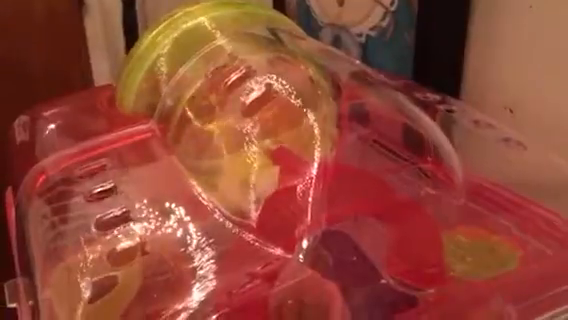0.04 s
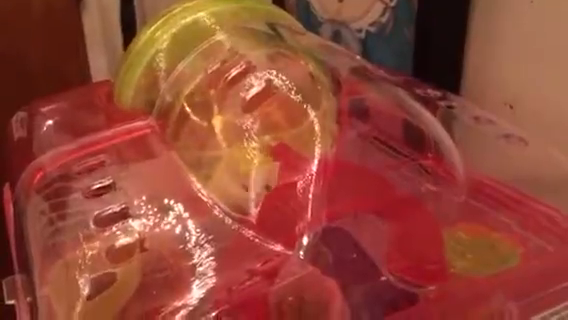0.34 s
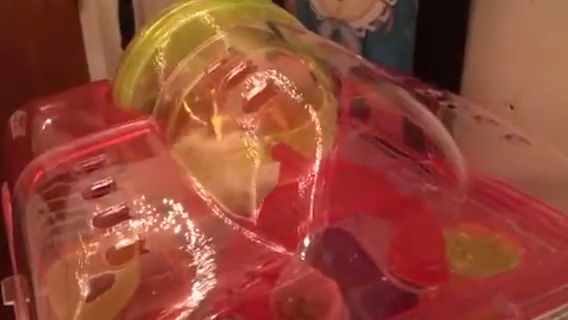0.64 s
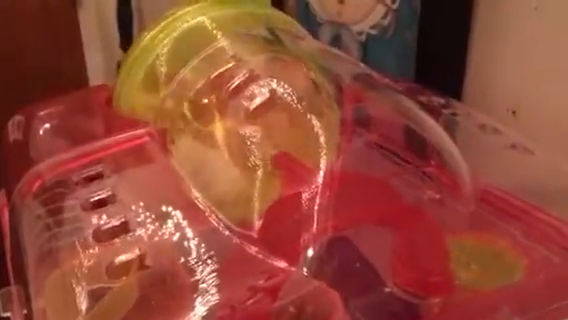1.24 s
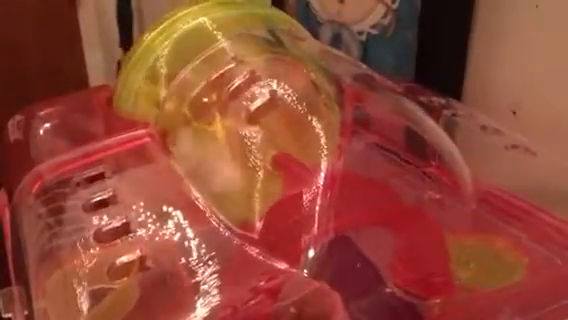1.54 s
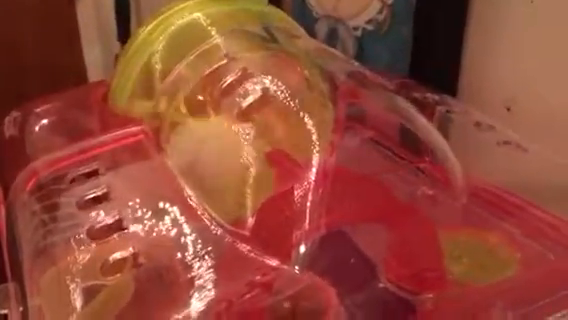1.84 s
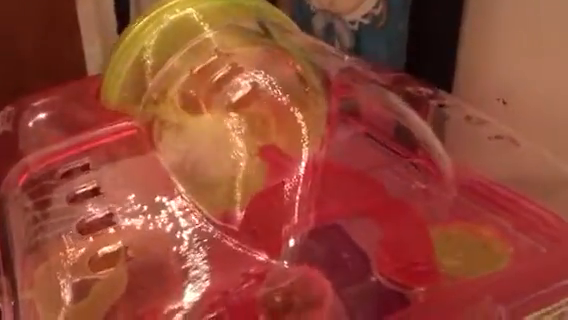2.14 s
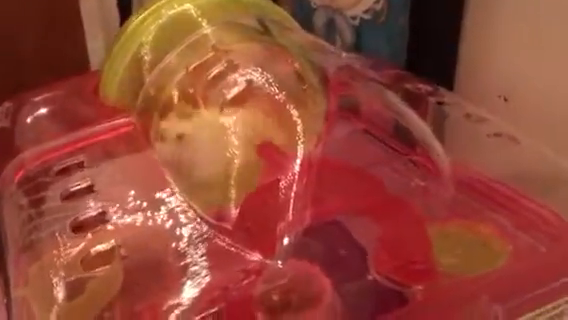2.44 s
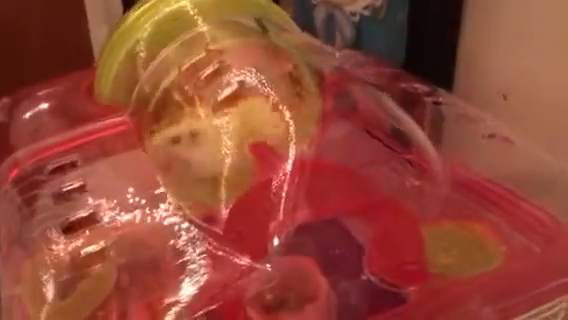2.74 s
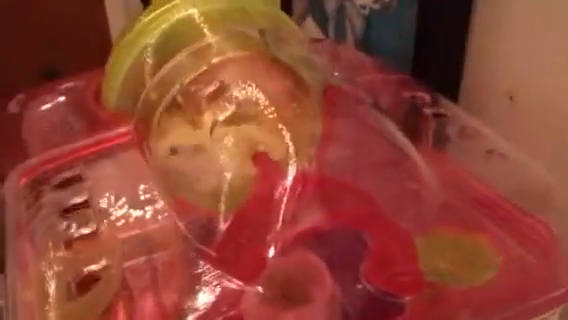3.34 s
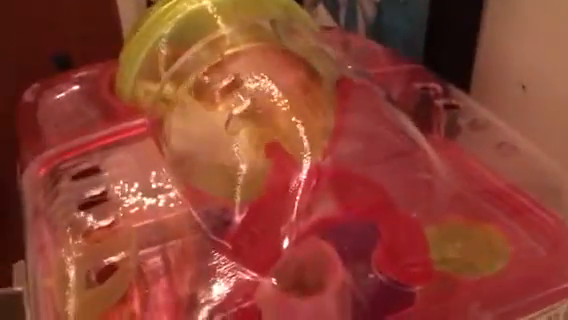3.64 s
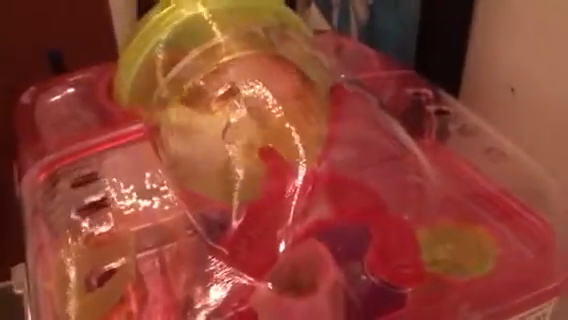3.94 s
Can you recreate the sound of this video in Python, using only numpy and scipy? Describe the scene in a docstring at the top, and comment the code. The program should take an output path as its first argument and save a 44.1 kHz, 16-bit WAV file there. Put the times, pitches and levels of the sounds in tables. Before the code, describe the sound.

A hamster runs in a plastic wheel that rumbles and knocks against its cage.

```python
"""Hamster in a plastic wheel

A hamster starts to run in a plastic wheel fixed to a plastic cage, in a quiet room. Claws tick,
paws tap and scuff on the track, and the hollow wheel booms under its weight. The turning wheel
rumbles through the cage in surges; its loose axle creaks early on and knocks at speed.
A low hum and a faint hiss lie underneath."""
import sys
import numpy as np
from scipy import signal
from scipy.fft import rfft, irfft
from scipy.io import wavfile
from scipy.ndimage import uniform_filter1d

SR = 44100
rng = np.random.default_rng(int(sys.argv[2]) if len(sys.argv) > 2 else 0)


def digitize_waveform(pressure):
    """Quantize a signal to 16-bit integers and store it at the path in sys.argv[1].

    Rows of a 2-D input are taken as channels; values are limited to [-1, 1].
    """
    field = np.atleast_2d(pressure).T
    bounded = np.clip(field, -1, 1)
    quanta = np.round(bounded * 32767).astype(np.int16)
    wavfile.write(sys.argv[1], SR, quanta)


N = 176400

# EQ curves of room tone, scuffs, claws, rumble and knocks: f/Hz, relative level/dB
AIR_EQ = [(20,-35),(35,-12),(55,3.5),(90,-3),(140,0),(220,-13.5),(330,-18),(600,-28),(1200,-33.5),(3000,-38.5),(8000,-41),(16000,-38)]
SCUFF_EQ = [(60,-24),(280,6),(900,5.5),(1600,4.5),(3200,-3),(5000,-8),(9000,-11.5),(16000,-12)]
CLAW_EQ = [(150,-10),(600,3),(1800,-3),(4000,0.5),(7000,4.5),(9500,5),(10500,2.5),(12500,7.5),(16000,2.5)]
ROLL_EQ = [(50,-16.5),(110,-9),(180,2.5),(300,-1),(600,-0.5),(760,-11.5),(950,-2),(1400,-16),(2400,-21),(5000,-35.5),(15000,-52)]
KNOCK_EQ = [(80,-22),(180,-9),(290,1.5),(700,2),(1300,4),(2200,-4),(3300,0.5),(4900,-4),(6500,-1.5),(8200,-6),(11000,-4.5),(16000,-7)]
# steady hum: f/Hz, level/dB
HUM_PARTIALS = [(56.7,-56),(140,-67.5),(187.5,-68.5)]
# decay of the room, and of a knock in the shell: f/Hz, T60/s
ROOM_DECAY = [(200,0.17),(1000,0.52),(4000,0.28),(14000,0.15)]
SHELL_DECAY = [(200,0.13),(1000,0.13),(3000,0.057),(7000,0.044),(14000,0.017)]
# resonances of wheel and cage: f/Hz, width/Hz, boost/dB
PLASTIC_MODES = [(193,12,8.5),(234.5,30,6),(287.8,28,9),(328,5.9,7),(431,17.4,7.5),(653,68,5),(928.5,39,8),(1180,12,7.5),(1370,18,0.5),(1563,20,6),(2069,57,7.5),(2790,270,5),(4040,660,4),(5820,300,4.5)]
# boom of the hollow wheel: f/Hz
WHEEL_MODES = [175, 294.6, 335, 479, 658.5]
# axle creaks: t/s, length/s, level/dB, f/Hz
CREAK_CUES = [(.004,0.059,-72.5,6500),(0.06,0.034,-59.5,3240),(1.194,0.029,-56,3830)]
# feet and rim scuffing: t/s, length/s, relative level/dB
SCUFF_CUES = [(0.048,0.053,-55),(0.214,0.052,-58.5),(0.734,0.037,-67),(1.02,0.045,-58),(1.172,0.083,-56),(1.861,0.065,-44.5),(2.008,0.024,-49),(2.12,0.044,-44.5),(2.32,0.06,-40.5),(2.717,0.03,-38),(3.539,0.039,-41)]
# paws landing: t/s, relative level/dB, struck spot's f/Hz
PAW_CUES = [(.064,-67,1547),(.232,-70,1540),(0.972,-62,987),(1.137,-55,974),(1.452,-48,596),(1.538,-43,616),(1.696,-57,940),(2.086,-44,612)]
# claws ticking on the track: t/s, relative level/dB, fade/s
CLAW_CUES = [(0.729,-67,0.013),(.787,-63.5,0.0044),(1.004,-59,.004),(1.018,-53,0.011),(1.1564,-46,0.0081),(1.1844,-52,0.0029),(1.2027,-47,.009),(1.2394,-47,0.0076),(1.247,-50,0.0087),(1.273,-46,0.0046),(1.278,-42.5,0.0049),(1.3161,-46,0.008),(1.327,-53,.006),(1.3875,-59,0.0092),(1.422,-59,0.0044),(1.491,-56,.006),(1.509,-48,0.005),(1.5894,-51.5,0.013),(1.6185,-50,0.0072),(1.7282,-51,0.0096),(1.7415,-49,0.0046),(1.805,-55,0.0044),(1.983,-54.5,0.0057),(2.083,-45.5,0.0077),(2.141,-53.5,0.016),(2.608,-50,0.0051),(3.588,-49,0.0079),(3.779,-57,0.0069),(3.907,-50,0.0036)]
# the runner's weight landing: t/s, relative level/dB, most excited f/Hz
THUMP_CUES = [(1.177,-41.5,169),(1.195,-45,620),(1.232,-54,300),(1.521,-47,220),(1.905,-42.5,350),(2.748,-38,350),(3.235,-41,377)]
# fader rides of the light patter and the rolling wheel: t/s, relative level/dB
PATTER_FADER = [(.6,-98),(.67,-67),(.7,-90),(.96,-75.5),(1.03,-56.5),(1.25,-61.5),(1.8,-60.5),(2.2,-59.5),(2.75,-57.5),(3.35,-60),(3.6,-59.5),(4,-61)]
ROLL_FADER = [(0.95,-64.5),(1.17,-58.5),(1.245,-42.5),(1.35,-59),(1.42,-51),(1.51,-49.5),(1.54,-44),(1.7,-47),(1.73,-43.5),(1.82,-49),(1.915,-38),(1.95,-43.5),(2.12,-47.5),(2.16,-39),(2.22,-46.5),(2.26,-42),(2.29,-45.5),(2.35,-36),(2.44,-41),(2.52,-39),(2.6,-46),(2.67,-37.5),(2.72,-41.5),(2.745,-33),(2.89,-42),(2.97,-39),(3.01,-37.5),(3.06,-44),(3.25,-37),(3.29,-47),(3.61,-38),(3.73,-39.5),(3.79,-42.5),(4.0,-41.5)]
# axle knocks: t/s, relative level/dB, treble tilt/(dB per octave), low shelf/dB, struck spot's f/Hz
KNOCK_CUES = [(1.834,-53,-3,5.5,1420),(2.085,-47,-4,-17,2590),(2.307,-43.5,1,-4,2750),(2.4765,-42.5,3.5,12,1680),(2.5128,-35.5,1.5,6,2770),(2.675,-39,-1.5,-8,3600),(2.7124,-40.5,1,1,5850),(2.732,-34.5,1,7,1990),(2.7706,-31.5,1,-4,1993),(2.8581,-41.5,-3.5,-19,1380),(2.9209,-33,-1.5,-6,1550),(2.9538,-39,1,-8,3830),(3.008,-36,-3,-21,1310),(3.1036,-36.5,-2,-19,1400),(3.1347,-38.5,-1.5,-26,1370),(3.173,-46.5,3.5,-5,5720),(3.206,-35,0.5,-12.5,5880),(3.3736,-53,-6,-7,2200),(3.44,-44.5,-1,-3,1750),(3.48,-43,4,15,1520),(3.5934,-43.5,-1.5,3,2070),(3.655,-41.5,-3.5,-6,2160),(3.805,-42,1,5.5,4170),(3.9178,-43.5,-5,-19,3110)]


def amp(db):
    """Decibels to gain."""
    return 10 ** (np.asarray(db) / 20)


def unit(x):
    """Scales to rms 1."""
    return x / np.sqrt(np.mean(x ** 2) + 1e-20)


def curve_at(points, hz):
    """Reads a table on a log-frequency axis."""
    f, value = np.transpose(points)
    return np.interp(np.log(hz + 1), np.log(f + 1), value)


def fader(points):
    """A gain ride through the points, silent before the first."""
    return amp(np.interp(np.arange(N) / SR, *np.transpose(points), left=-120))


def add(mix, start, sound):
    """Drops a sound into the mix, start seconds in."""
    part = mix[max(round(start * SR), 0):][:len(sound)]
    part += sound[:len(part)]


def strike(t, rise_s, t60):
    """Envelope of a hit: linear attack, exponential decay."""
    return np.minimum(t / rise_s, 1) * 1e-3 ** (t / t60)


def noise_tail(decay, size, bands=8):
    """Noise whose bands each die at their own speed."""
    t, hz = np.arange(size) / SR, np.fft.rfftfreq(size, 1 / SR)
    centres = np.geomspace(150, 15000, bands)
    spectrum = rfft(rng.standard_normal(size))
    tail = np.zeros(size)
    for centre, solo in zip(centres, np.eye(bands)):
        band = irfft(spectrum * curve_at(list(zip(centres, solo)), hz), size)
        tail += band * 1e-3 ** (t / curve_at(decay, centre))
    return tail


def grains(per_s, spread_db):
    """Random tiny impacts; spread_db makes their strength uneven."""
    strength = amp(spread_db * np.minimum(rng.exponential(1, N), 3.5))
    return unit(strength * rng.choice([-1, 1], N) * (rng.random(N) < per_s / SR))


def plastic(x, eq, size=16384):
    """The plastic body: a broad EQ, boosted where wheel and cage resonate."""
    hz = np.fft.rfftfreq(size, 1 / SR)
    peaks = sum((amp(boost) ** 2 - 1) / (1 + (2 * (hz - f) / width) ** 2)
                for f, width, boost in PLASTIC_MODES)
    db = curve_at(eq, hz) + 10 * np.log10(1 + peaks)
    # minimum phase, so the ring follows the hit
    cepstrum = irfft(np.log(amp(db)))
    cepstrum[1:size // 2] *= 2
    cepstrum[size // 2 + 1:] = 0
    ring = irfft(np.exp(rfft(cepstrum)))[:size // 2]
    return signal.fftconvolve(x, ring / np.linalg.norm(ring))[:N]


def spot_colour(hz, band_hz=706, spread_db=4.5, max_boost_db=3.5, count=12):
    """Each spot of the shell favours its own random set of bands."""
    cycles = hz[:, None] / (2 * band_hz) * rng.uniform(.2, 2, count) + rng.random(count)
    ripple = unit(np.cos(2 * np.pi * cycles).sum(1))
    depth = np.minimum(hz / 3270, 1)  # flatter towards the bass
    return unit(amp(np.minimum(spread_db * ripple, max_boost_db) * depth))


def spot_ring(hz, t, scatter=0.06, count=3):
    """The tone of one struck spot: a tight cluster of partials."""
    detune = 1 + scatter * (2 * (np.arange(count) + rng.random(count)) / count - 1)
    cycles = hz * detune * t[:, None] + rng.random(count)
    return np.sin(2 * np.pi * cycles).sum(1) / np.sqrt(count)


def room_tone(air_db=-58):
    """The bed: steady hum, low rumble and faint hiss."""
    t, hz = np.arange(N) / SR, np.fft.rfftfreq(N, 1 / SR)
    air = unit(irfft(rfft(rng.standard_normal(N)) * amp(curve_at(AIR_EQ, hz)), N))
    hum = sum(amp(db) * np.sqrt(2) * np.sin(2 * np.pi * (f * t + rng.random()))
              for f, db in HUM_PARTIALS)
    return amp(air_db) * air + hum


def reverb(x, wet_db=-12, rise_s=0.006, size=20000):
    """Cage walls and room add a short tail."""
    tail = noise_tail(ROOM_DECAY, size) * np.minimum(np.arange(size) / SR / rise_s, 1)
    return x + amp(wet_db) * signal.fftconvolve(x, tail / np.linalg.norm(tail))[:N]


def creaks(width_hz=150):
    """Each short slip of the axle excites one narrow resonance."""
    out = np.zeros(N)
    for start, length, db, hz in CREAK_CUES:
        progress = np.arange(0, 1, 1 / (length * SR))
        resonance = signal.iirpeak(hz, hz / width_hz, SR)
        squeak = signal.lfilter(*resonance, rng.standard_normal(N))[-len(progress):]
        add(out, start, amp(db) * unit(squeak) * np.sin(np.pi * np.sqrt(progress)))
    return out


def scuffs(trim_db=-0.5, peak_at=0.57):
    """Brief rubs: each a swell of tiny slips on the plastic."""
    t = np.arange(N) / SR
    pressure = sum(amp(db) * np.interp(t, [start, start + peak_at * length, start + length], [0, 1, 0])
                   for start, length, db in SCUFF_CUES)
    return amp(trim_db) * plastic(pressure * grains(per_s=3400, spread_db=0), SCUFF_EQ)


def paws(ring_db=7.5, cutoff_hz=1010, size=8000):
    """Padded feet land with dull, hollow taps."""
    out, t = np.zeros(N), np.arange(size) / SR
    tap = strike(t, rise_s=0.0025, t60=0.07)
    padding = signal.butter(3, [cutoff_hz / 4, cutoff_hz], "bandpass", fs=SR, output="sos")
    for start, db, spot_hz in PAW_CUES:
        thud = unit(signal.sosfilt(padding, rng.standard_normal(size)))
        add(out, start, amp(db) * tap * (thud + amp(ring_db) * spot_ring(spot_hz, t)))
    return out


def claws(tick_db=4, patter_db=-1.5, rise_s=0.0007, touch_fade_s=0.0072, size=3000):
    """Claws strike the track: bright ticks over a fine patter of lighter touches."""
    ticks, t, hz = np.zeros(N), np.arange(size) / SR, np.fft.rfftfreq(size, 1 / SR)
    attack = np.minimum(t / rise_s, 1)
    for start, db, fade_s in CLAW_CUES:
        noise = irfft(rfft(rng.standard_normal(size)) * spot_colour(hz))
        add(ticks, start, amp(db + tick_db) * attack * np.exp(-t / fade_s) * noise)
    touch = attack * np.exp(-t / touch_fade_s)
    touch_power = signal.fftconvolve(grains(per_s=170, spread_db=3.2) ** 2, touch ** 2)[:N]
    patter = unit(np.sqrt(abs(touch_power)) * rng.standard_normal(N))
    return plastic(ticks + amp(patter_db) * fader(PATTER_FADER) * patter, CLAW_EQ)


def thumps(reach_octaves=0.79, size=12000):
    """The hollow wheel booms under the runner; where it lands decides which modes speak."""
    out, t, hz = np.zeros(N), np.arange(size) / SR, np.array(WHEEL_MODES)[:, None]
    boom = strike(t, rise_s=0.007, t60=0.23)
    for start, db, centre_hz in THUMP_CUES:
        weights = np.exp(-(np.log2(hz / centre_hz) / reach_octaves) ** 2)
        modes = np.sin(2 * np.pi * (hz * t + rng.random(hz.shape)))
        add(out, start, amp(db) * boom * (weights * modes).sum(0))
    return out


def rolling(trim_db=-1.5, crossover_hz=750, brighten=0.61, neutral_db=-42):
    """Small bumps of the turning wheel shake the cage; harder running sounds brighter."""
    gain = fader(ROLL_FADER)
    bumps = plastic(grains(per_s=900, spread_db=1.5), ROLL_EQ)
    bumps /= np.sqrt(uniform_filter1d(bumps ** 2, size=2600) + 1e-9)  # level out ahead of the fader
    lows = signal.sosfiltfilt(signal.butter(2, crossover_hz, fs=SR, output="sos"), bumps)
    highs = (bumps - lows) * (gain / amp(neutral_db)) ** brighten
    return amp(trim_db) * gain * (lows + highs)


def knocks(clack_db=7.5, ring_db=1.5, rise_s=0.0011, shelf_hz=990, pivot_hz=3270, size=12000):
    """The wheel drops against its axle and chatters once; the thin shell clacks and the spot rings."""
    clacks, rings = np.zeros(N), np.zeros(N)
    t, hz = np.arange(size) / SR, np.fft.rfftfreq(size, 1 / SR)
    attack = np.minimum(t / rise_s, 1)
    ring_envelope = strike(t, rise_s, t60=0.052)
    for start, db, tilt_db, shelf_db, spot_hz in KNOCK_CUES:
        tilt = tilt_db * np.log2(np.maximum(hz, shelf_hz) / pivot_hz)
        shelf = shelf_db / (1 + (hz / shelf_hz) ** 4)
        colour = spot_colour(hz) * amp(tilt + shelf)
        chatter_s = 0.0028 * rng.uniform(.5, 2)
        for delay, gain in [(0, 1), (chatter_s, 0.45)]:
            clack = attack * irfft(rfft(noise_tail(SHELL_DECAY, size)) * colour)
            add(clacks, start + delay, gain * amp(db) * clack[:size // 2])
        add(rings, start, amp(db + ring_db) * ring_envelope * spot_ring(spot_hz, t))
    return amp(clack_db) * plastic(clacks, KNOCK_EQ) + rings


def scene():
    """Mono mix: wheel and runner through the reverb, over the room tone."""
    action = rolling() + knocks() + claws() + paws() + thumps() + scuffs() + creaks()
    return (reverb(action) + room_tone())[None]


def record(dry, cutoff_hz=15950):
    """A steep high cut on the master."""
    high_cut = signal.firwin(511, cutoff_hz, window=("kaiser", 9), fs=SR)
    return signal.oaconvolve(dry, high_cut[None], "same")


dry = scene()
out = record(dry)
digitize_waveform(out)
```